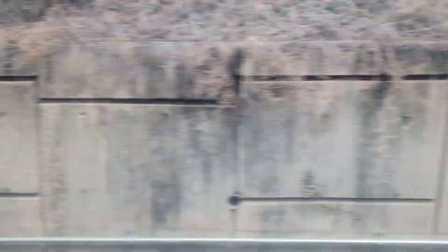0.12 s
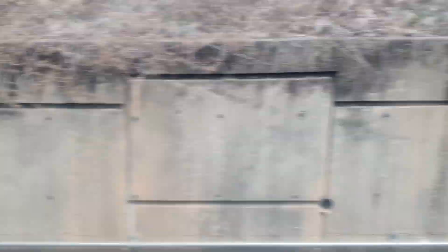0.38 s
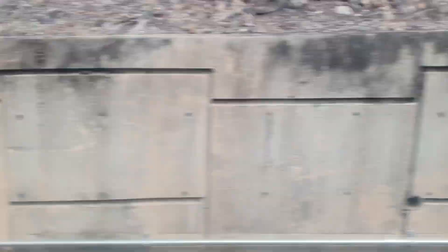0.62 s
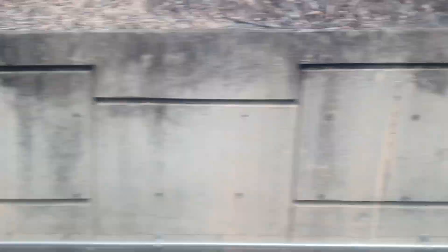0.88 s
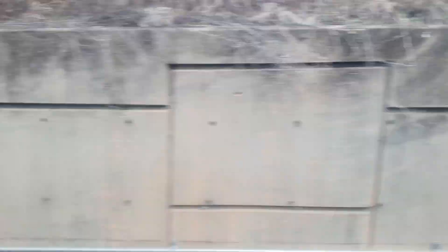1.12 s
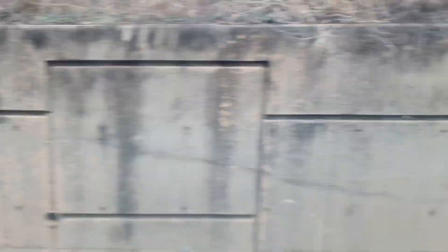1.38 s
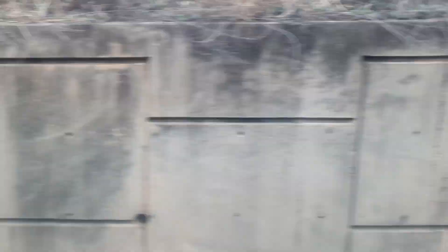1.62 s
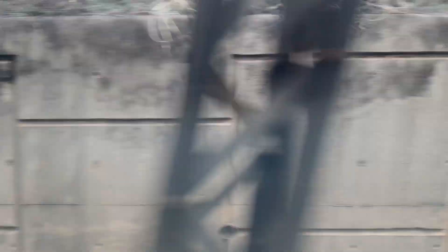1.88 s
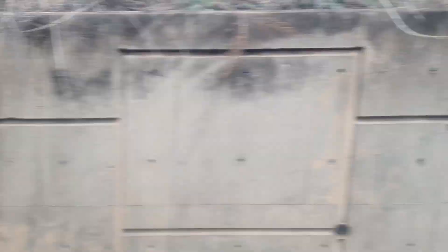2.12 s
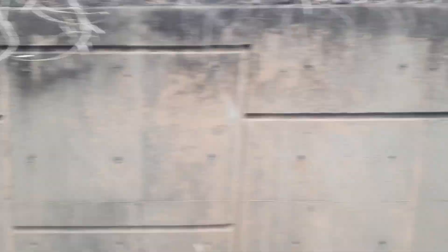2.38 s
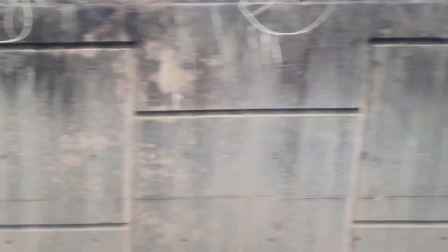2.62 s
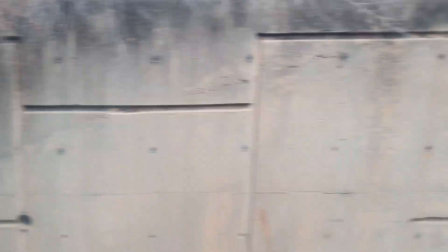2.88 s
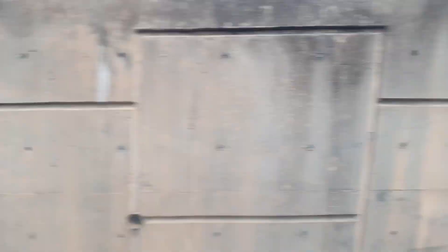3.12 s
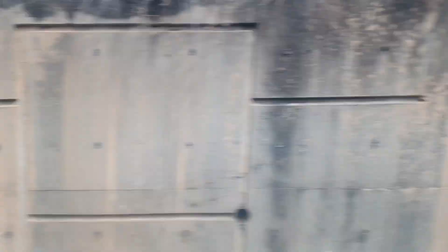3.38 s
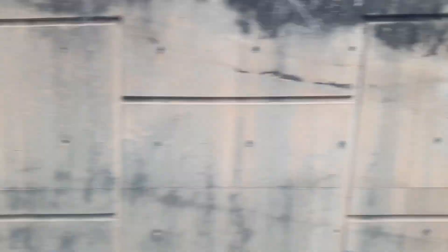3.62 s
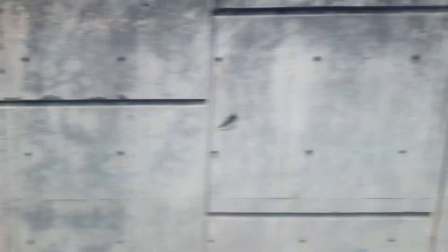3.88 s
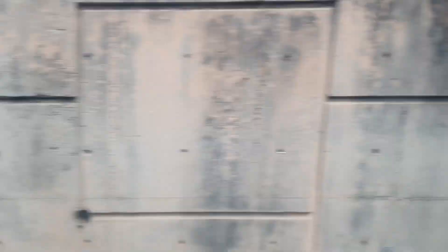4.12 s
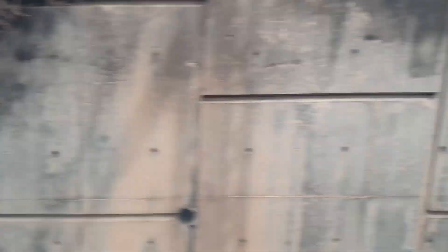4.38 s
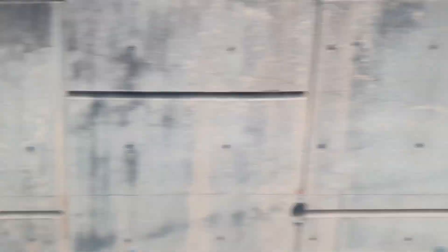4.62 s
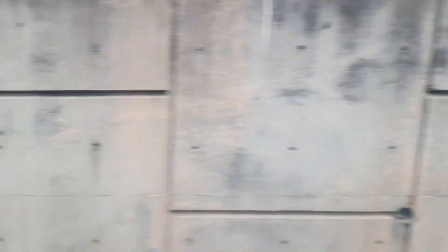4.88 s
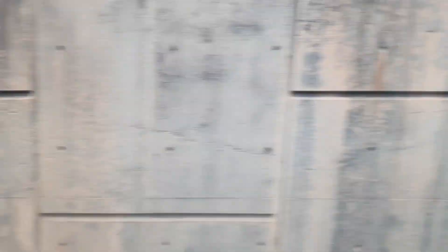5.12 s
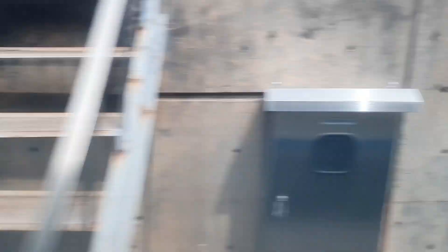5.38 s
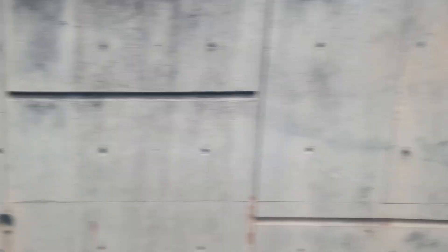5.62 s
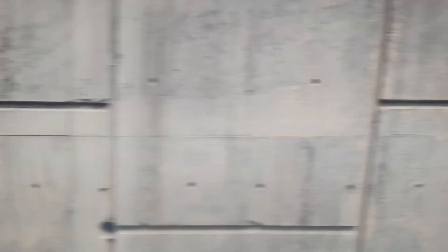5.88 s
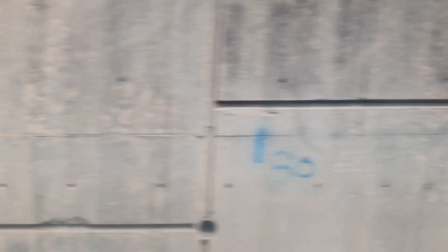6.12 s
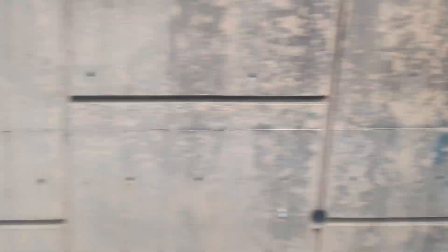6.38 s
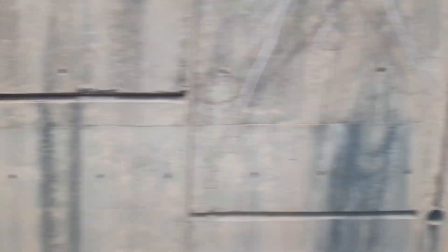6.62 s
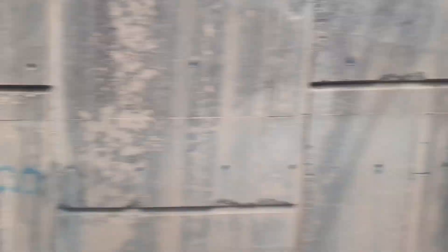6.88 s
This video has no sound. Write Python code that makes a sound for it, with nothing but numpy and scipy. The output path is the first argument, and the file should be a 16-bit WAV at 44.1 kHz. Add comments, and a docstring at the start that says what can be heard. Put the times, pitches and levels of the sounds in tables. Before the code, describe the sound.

Low, wavering carriage rumble at speed, loose fittings rattling and ticking, a sudden air-leak hiss midway fading away over a faint hum.

```python
"""Inside a fast train carriage

A train carriage runs fast along a concrete wall, heard by two spaced microphones. A wavering low tone
makes the boom; shaped noise makes the roar of wheels and air, lifted here and there by jolts. Noise puffs
ring loose fittings in short rattles, with small ticks between. One long hiss of filtered noise comes with
a low, fuzzy moan. Behind lie a thin rush of air noise, a faint wavering hum and thin whines.
"""
import sys
import numpy as np
from scipy import signal
from scipy.fft import rfft, irfft, next_fast_len
from scipy.io import wavfile
from scipy.ndimage import uniform_filter1d

SR = 44100
rng = np.random.default_rng(int(sys.argv[2]) if len(sys.argv) > 2 else 0)


def rack_gain(trim_db):
    """Turn a fader trim in dB into the linear factor to multiply a signal by."""
    fader = np.asarray(trim_db, float)
    return 10 ** (fader / 20)


def to_wav(s):
    """Save 16-bit WAV."""
    ch = np.atleast_2d(s).T  # columns
    pcm = np.round(np.clip(ch, -1, 1) * 32767)  # PCM
    wavfile.write(sys.argv[1], SR, pcm.astype(np.int16))


N = 308700  # samples, 7 s


def evened(x):
    """Scales to rms 1."""
    return x / np.sqrt(np.mean(x ** 2) + 1e-20)


def read(points, hz):
    """Reads a spectrum table on a log-frequency axis."""
    f, value = np.transpose(points)
    return np.interp(np.log(hz + 1), np.log(f + 1), value)


def curve(rows, t, count=1):
    """Reads one column of a time table at times t."""
    rows = np.asarray(rows)
    return np.interp(t, rows[:, 0], rows[:, count])


def humps_db(humps, hz):
    """Sums humps and dips of a spectrum in dB."""
    return sum(db / (1 + (2 * (hz - f) / width) ** 2) for f, width, db in humps)


def through(x, humps):
    """Filters x by fixed humps and dips."""
    size = next_fast_len(N)
    gain = rack_gain(humps_db(humps, np.fft.rfftfreq(size, 1 / SR)))
    return irfft(rfft(x, size) * gain, size)[..., :N]


def band(x, lo_hz, hi_hz):
    """Band-pass."""
    return signal.sosfilt(signal.butter(3, [lo_hz, hi_hz], "band", fs=SR, output="sos"), x)


def noise(field_db, size):
    """Two unrelated noises whose short-time level follows field_db(hz, t)."""
    hop = size // 4
    frames, hz = N // hop + 5, np.fft.rfftfreq(size, 1 / SR)[:, None]
    t = (np.arange(frames) * hop / SR)[None]
    real, imag = rng.standard_normal((frames, len(hz), 2, 2)).T
    spectrum = (real + 1j * imag) * rack_gain(field_db(hz, t))
    return signal.istft(spectrum, nperseg=size, noverlap=size - hop)[1][:, :N]


def patches(hz, t, size):
    """Random patches over time and frequency, rms 1."""
    field = rng.standard_normal((t.size, hz.size)).T
    return evened(uniform_filter1d(uniform_filter1d(field, size, 0), size, 1))


def slow(hz):
    """Slow random drift up to about hz, rms 1, one value per 100 samples."""
    low_pass = signal.butter(2, hz, fs=SR / 100, output="sos")
    return evened(signal.sosfiltfilt(low_pass, rng.standard_normal(N // 100 + 2)))


def rough(hz):
    """Random complex swell of power about 1, as fast as hz."""
    t, coarse = np.arange(N), np.arange(N // 100 + 2) * 100
    return (np.interp(t, coarse, slow(hz)) + 1j * np.interp(t, coarse, slow(hz))) / np.sqrt(2)


# main mode of the carriage air space: t/s, f/Hz, level/dB
BOOM_TRACK = [(0, 77.1, -26), (.2, 80.1, -18.5), (.4, 72.4, -31), (.62, 70.2, -21), (.85, 71.97, -13),
              (1.04, 73.35, -28), (1.25, 74.11, -12), (1.55, 73.6, -17.5), (1.9, 73, -16),
              (2.8, 71.71, -15), (3.15, 81.76, -19), (3.4, 74.97, -18), (3.9, 73.07, -13.5), (4.3, 70, -18),
              (4.85, 73.4, -13), (5.15, 86.47, -24), (5.55, 70, -14), (5.95, 67.3, -18), (6.1, 69.3, -27.5),
              (6.5, 70, -21.5), (6.68, 72.9, -24.5), (6.8, 69.1, -15), (7, 68.35, -19)]


def boom():
    """The carriage air space booms near 70 Hz: one main mode swells and beats against the next one up."""
    swell_hz, swell_db = 8.7, -3.5  # speed and depth of the main mode's random swell
    upper_gap_hz, upper_width_hz, upper_db = 15, 5, -6  # a rougher mode just above makes the boom throb
    t = np.arange(N) / SR
    main = 1 + rack_gain(swell_db) * rough(swell_hz)
    upper = rack_gain(upper_db) * rough(upper_width_hz) * np.exp(2j * np.pi * upper_gap_hz * t)
    carrier = np.exp(2j * np.pi * np.cumsum(curve(BOOM_TRACK, t)) / SR)
    tone = evened(((main + upper) * carrier).real)
    # the air space carries little below its lowest mode
    return band(rack_gain(curve(BOOM_TRACK, t, count=2)) * tone, 49, 190)


# slow swell of the roar, only its changes count: t/s, level/dB
ROAR_SWELL = [(0, -32), (.45, -34), (.9, -32), (1.4, -33), (2, -31), (2.6, -31), (3.2, -31.5), (3.9, -32.5),
              (4.4, -30), (5.1, -31.5), (5.7, -31), (5.95, -33), (6.5, -34.5), (7, -34.5)]
# relative colour of the roar heard alike by both microphones: f/Hz, level/dB per Hz
ALIKE_COLOUR = [(12, -58.5), (20, -34), (32, -31.5), (53, -11.5), (79, 4.5), (119, -10.5), (142, -26),
                (167, -14.5), (262, -25.5), (516, -26.5), (691, -38), (1360, -47), (1490, -53.5),
                (3070, -55), (4400, -69.5), (5720, -102), (9680, -120)]
# relative colour of the roar heard in opposite sense, before its trim: f/Hz, level/dB per Hz
OPPOSED_COLOUR = [(12, -57.5), (20, -23.5), (32, -19.5), (62, 0.5), (91, -0.5), (139, -12), (368, -13),
                  (430, -16), (723, -18.5), (1040, -26), (1740, -35.5), (1910, -33.5), (2390, -42.5),
                  (3210, -41.5), (4400, -52.5), (5720, -69.5), (9680, -120)]
# carriage body resonances, with broad bass shaping that thins the roar under the boom;
# full depth in the alike part: f/Hz, width/Hz, level/dB
BODY_SHAPING = [(28, 9.1, 4), (48, 7.7, -3.5), (75.5, 13, -11.5), (114, 9.4, 2), (159, 11, 6.5),
                (217.6, 11, 5), (371.5, 35, 4), (527.4, 31, 3), (568.3, 20, 6.5), (643, 17, 6),
                (835, 33, 4), (1380, 17, 3), (1970, 30, 6), (2940, 30, 2), (3110, 12, 1), (3780, 44, 5.5)]
# jolts of the track, peak changes: t/s, fade each side/s, bass level/dB, middle level/dB, treble level/dB
TRACK_JOLTS = [(1.126, 0.11, 1, 2.5, 3), (1.33, 0.12, 3, 1, 5), (1.739, 0.097, 8.5, 1.5, 1),
               (2.229, 0.16, 3.5, 1, 1.5), (3.039, 0.058, 4.5, 0, 2.5), (3.356, 0.25, 4, 4.5, 3),
               (4.266, 0.12, 5.5, 0.5, -1), (5.198, 0.044, 16, 0.5, 2.5), (5.484, 0.068, 6, 5, 4),
               (5.656, 0.08, 2.5, 2, 5.5), (6.736, 0.18, -2.5, 1.5, 5.5)]


def roar():
    """Wheel and air noise through the body; a slow level drives all bands and jolts alter them briefly."""
    opposed_db, bass_follows = -13, 1.3  # opposed trim; bass dB per dB of swell

    def field_db(hz, t):
        level = curve(ROAR_SWELL, t) - np.mean(ROAR_SWELL, axis=0)[1]
        low, mid, high = sum(np.reshape(db, (-1, 1, 1)) * np.clip(1 - abs(t - s) / fade, 0, 1)
                             for s, fade, *db in TRACK_JOLTS)
        bass = np.clip(1 - 3 * np.log2(hz / 125 + 1e-9), 0, 1)
        treble = np.clip(np.log2(hz / 700 + 1e-9), 0, 1)
        middle = 1 - bass - treble
        swell = bass * (bass_follows * level + low) + middle * (level + mid) + treble * (level + high)
        colour = np.array([read(ALIKE_COLOUR, hz), read(OPPOSED_COLOUR, hz) + opposed_db])
        return colour + swell + 2.89 * patches(hz, t, size=5)

    alike, opposed = noise(field_db, size=2048)
    alike = through(alike, BODY_SHAPING)
    # the body resonances are mostly in step at both microphones
    opposed = through(opposed, [(f, width, .4 * db) for f, width, db in BODY_SHAPING])
    pair = np.array([alike + opposed, alike - opposed])
    return rack_gain(-29.5) * pair / np.sqrt(np.mean(band(alike, 146.0, 1800) ** 2))


# knocks, before the common trim: t/s, low-band level/dB, mid-band level/dB, high-band level/dB
KNOCKS = [(0.0444, -47.5, -53.5, -59.5), (.108, -51, -61, -74.5), (.385, -60, -57.5, -67),
          (.397, -52, -58, -65), (1.062, -48, -56, -76), (1.103, -44.5, -50, -59.5),
          (1.1153, -52, -56, -68), (1.125, -45.5, -56, -66), (1.1777, -39.5, -53.5, -73.5),
          (1.1917, -46, -57, -64), (1.2398, -40, -48.5, -57), (1.255, -53, -53.5, -69),
          (1.268, -53, -58, -65), (1.311, -42.5, -51, -62.5), (1.3549, -39.5, -49, -62.5),
          (1.3899, -58.5, -58.5, -65), (1.4153, -39.5, -51, -65), (1.428, -51, -59.5, -69.5),
          (1.622, -61, -67, -71), (1.802, -52, -57.5, -68.5), (2.09, -57.5, -61, -78.5),
          (2.224, -36.5, -46.5, -57), (2.237, -43, -57, -72), (2.28, -45, -60, -73),
          (2.2956, -43.5, -53.5, -68.5), (2.3136, -45.5, -62, -73), (2.325, -48.5, -68, -76),
          (2.3705, -40, -55, -72), (2.935, -65, -65, -75), (3.0432, -62, -57.5, -73.5),
          (3.057, -50, -60.5, -70.5), (3.1258, -52, -56, -69.5), (3.1393, -52, -54, -76.5),
          (3.7022, -38, -51, -62), (3.7666, -58, -52.5, -57), (3.784, -40, -50, -56.5),
          (3.9506, -48.5, -56.5, -63.5), (4.0657, -67, -54.5, -58.5), (4.2228, -43, -51.5, -68),
          (4.2471, -47, -51.5, -62), (4.2596, -43, -60, -65), (4.2733, -43.5, -54, -69.5),
          (4.2887, -46, -64, -67), (4.3758, -49.5, -53, -66.5), (4.7748, -46, -57.5, -79),
          (4.855, -50, -52.5, -57), (4.965, -54, -57, -82.5), (5.296, -51.5, -63, -76),
          (5.4264, -56, -53.5, -56.5), (5.4862, -49.5, -65.5, -90.5), (5.529, -50.5, -56, -74.5),
          (5.5426, -48.5, -60, -75), (5.5768, -36.5, -50, -66), (5.642, -41.5, -58, -82),
          (5.6802, -40.5, -60, -77), (5.72, -45.5, -62, -82.5), (5.745, -40.5, -57.5, -83),
          (6.178, -57, -62, -84.5), (6.283, -58, -67, -84.5), (6.592, -55, -60, -76.5),
          (6.671, -47.5, -57.5, -79.5), (6.7757, -50, -55, -67.5), (6.7985, -47, -54, -73),
          (6.824, -50, -54.5, -71.5), (6.8417, -44, -61, -80), (6.9706, -43, -48, -57)]
# what the loose fittings ring with: f/Hz, half-width/Hz, level/dB
FITTING_MODES = [(1376, 69, -2.5), (2085, 190, -0.5), (2900, 64, -6.5), (3100, 51, -6.5),
                 (4030, 260, -11.5), (4790, 67, -12), (5680, 77, -9.5), (6460, 53, -6.5), (7140, 87, -19),
                 (12100, 100, -30.5)]
# time to rise 60 dB in the low, mid and high band: rise/s
RISE_S = [0.031, .028, .018]


def rattles():
    """Each knock is a short noise puff that rings the fittings, with a weaker, longer carriage answer."""
    t60_s, scatter_db = [.055, .04, .03], 1.5  # per band, treble dies first; random left-right difference
    tail_db, tail_t60_s = -16.0, 0.32  # the carriage answers
    size = next_fast_len(N + SR)
    hz = np.fft.rfftfreq(size, 1 / SR)
    ring = sum(rack_gain(db) / (1 + 1j * (hz - f) / half) for f, half, db in FITTING_MODES) + rack_gain(-11)
    force = np.zeros((3, 2, N))  # band, side, time
    t60 = np.reshape(t60_s, (3, 1, 1))
    rise_s = np.reshape(RISE_S, (3, 1, 1))
    pans_db = scatter_db * rng.standard_normal(len(KNOCKS))
    for (s, *band_db), pan_db in zip(KNOCKS, pans_db):
        here = slice(round((s - .015) * SR), min(round((s + .15) * SR), N))
        age = np.arange(here.start, here.stop) / SR - s
        rise = rack_gain(60 * np.minimum(age, 0) / rise_s)
        knock = rise * rack_gain(-60 * np.maximum(age, 0) / t60)
        tail = rack_gain(tail_db) * rise * rack_gain(-60 * np.maximum(age, 0) / tail_t60_s)
        side = rack_gain(np.array([[pan_db], [-pan_db]]) / 2)
        force[:, :, here] += rack_gain(band_db)[:, None, None] * side * (knock + tail)
    puff = rng.standard_normal((2, N)) + 0.3 * rng.standard_normal(N)  # partly shared by both sides
    out = np.zeros((2, N))
    for push, (lo_hz, hi_hz) in zip(force, [(750, 3440), (4500, 7540), (10600, 18000)]):
        unit = np.sqrt(np.sum(abs(ring[(hz > lo_hz) & (hz < hi_hz)]) ** 2) / len(hz))
        rung = irfft(rfft(push * puff, size) * ring, size)[:, :N]
        out += band(rung, lo_hz, hi_hz) / unit
    return rack_gain(-1.0) * out


def ticks():
    """Small ticks of the same fittings at random times throughout, as decaying bursts of treble noise."""
    rate_hz, t60_s = 25, 0.052
    size = rack_gain(2.4 * np.minimum(rng.exponential(1, N), 4)) * (rng.random(N) < rate_hz / SR)
    power_decay = rack_gain(-120 * np.arange(2000) / SR / t60_s)
    shape = np.sqrt(signal.oaconvolve(size ** 2, power_decay)[:N].clip(0))
    return rack_gain(-77) * shape * evened(band(rng.standard_normal((2, N)), 4200, 6900))


# air hiss, referred to its 5.9-9.2 kHz part: t/s, level/dB
HISS_LEVEL = [(3.245, -73.5), (3.27, -57), (3.4, -55.5), (3.65, -59), (3.8, -61.5), (4.0, -63.5),
              (4.15, -67), (4.3, -70)]
# relative colour of the hiss: f/Hz, level/dB per Hz
LEAK_COLOUR = [(880, -36.5), (1500, 0), (1860, 2.5), (2070, -1.5), (2980, 3), (3390, -3.5), (3960, -2),
               (4780, -9.5), (5870, -3.5), (7960, -9), (9220, -21), (13900, -18), (15000, -25.5),
               (15700, -24)]
# whistling edges in the hiss: f/Hz, width/Hz, level/dB
EDGE_TONES = [(4040, 36, 8.5), (5760, 40, 11.5), (5940, 40, 8), (6300, 36, 10.5), (7713, 30, 8.5),
              (8100, 40, 5), (10600, 150, 9), (14100, 130, 4)]


def hiss():
    """Air leaks through a narrow gap: turbulent noise, whistling faintly at the gap's edges."""
    left_db, shared = 1.5, 0.39  # leans left; how much of each side bleeds into the other

    def field_db(hz, t):
        return (read(LEAK_COLOUR, hz) + 1.4 * patches(hz, t, size=5))[None]

    air = noise(field_db, size=1024)
    air = through(air + shared * air[::-1], EDGE_TONES) * rack_gain([[left_db / 2], [-left_db / 2]])
    air /= np.sqrt(np.mean(band(air, 5910, 9200) ** 2))
    t = np.arange(N) / SR
    return rack_gain(curve(HISS_LEVEL, t)) * (t > HISS_LEVEL[0][0]) * (t < HISS_LEVEL[-1][0]) * air


# short low moan under the hiss: t/s, f/Hz, level/dB
MOAN_TRACK = [(3.24, 549.3, -60), (3.3, 547.3, -43), (3.55, 542, -39.5), (3.8, 536, -44), (3.93, 546, -57)]


def moan():
    """A gliding tone, fuzzy from a random swell, that comes with the air hiss."""
    t = np.arange(N) / SR
    carrier = np.exp(2j * np.pi * np.cumsum(curve(MOAN_TRACK, t)) / SR)
    tone = evened(((1 + 0.41 * rough(6)) * carrier).real)
    return rack_gain(curve(MOAN_TRACK, t, count=2)) * (t > MOAN_TRACK[0][0]) * (t < MOAN_TRACK[-1][0]) * tone


# faint rush of air along the window, before the final scaling: t/s, level/dB
RUSH_LEVEL = [(0, -60.5), (.21, -67.5), (.43, -68), (.55, -62), (.66, -68.5), (1.4, -69.5), (1.79, -63.5),
              (2, -71.5), (2.44, -65), (2.9, -68.5), (3.2, -66.5), (4.44, -70), (4.68, -66), (5.07, -66),
              (5.48, -69.5), (5.7, -67), (5.85, -75), (6.3, -79.5), (6.7, -73.5), (7, -76)]
# relative colour of the rush, before the upper band's trim: f/Hz, level/dB per Hz
WINDOW_COLOUR = [(2600, -40), (4000, 0), (5900, -0.5), (7400, -2), (8300, -8.5), (8800, -14), (9200, -2),
                 (11000, -5.5), (11800, 3), (13600, -1.5), (15700, -10)]


def rush():
    """Thin, patchy air noise along the window; the band above 9 kHz lies lower and drifts on its own."""
    top_db, top_drift_db = -15.5, 2.5  # trim and rms drift above 9 kHz

    def field_db(hz, t):
        drift = np.interp(t, np.arange(N // 100 + 2) * 100 / SR, slow(3))
        top = (hz > 9000) * (top_db + top_drift_db * drift)
        return (read(WINDOW_COLOUR, hz) + curve(RUSH_LEVEL, t) + top + 2.4 * patches(hz, t, size=5))[None]

    humps = [(5930, 30, 9), (6440, 40, 4)]  # f/Hz, width/Hz, level/dB
    return through(noise(field_db, size=512), humps) / 5  # many bins add up in each band


# faint hum, level of its fundamental: t/s, f/Hz, level/dB
HUM_TRACK = [(0, 712, -52), (2, 712, -52), (3.8, 712, -51), (4.8, 712, -47), (7, 712, -47)]


def hum():
    """A slightly wavering tone and its octave, in opposite sense at the two microphones."""
    t = np.arange(N) / SR
    waver_hz = 4 * evened(band(rng.standard_normal(N), 1.6, 12))
    turns = np.cumsum(curve(HUM_TRACK, t) + waver_hz) / SR
    tone = np.sin(2 * np.pi * turns) + rack_gain(-11) * np.sin(2 * np.pi * 2 * turns)
    return rack_gain(curve(HUM_TRACK, t, count=2)) * tone * np.array([[1.], [-1.]])


# faint whines of machinery: f/Hz, level/dB
WHINE_TONES = [(2350, -70), (3100, -73.5), (5890, -85)]


def whines():
    """Thin machinery tones at fixed pitches that come and go with random swells."""
    t = np.arange(N) / SR
    return sum(rack_gain(db) * (rough(5) * np.exp(2j * np.pi * hz * t)).real for hz, db in WHINE_TONES)


def scene():
    """All sources; the boom is so long in wavelength that both microphones hear it alike."""
    return boom() + roar() + rattles() + ticks() + hiss() + moan() + rush() + hum() + whines()


def band_limit(x):
    """A steep low-pass at the top of the band."""
    return signal.sosfilt(signal.butter(12, 15820, fs=SR, output="sos"), x)


def record(dry):
    """Delivers the finished two-microphone mix."""
    return band_limit(dry)


dry = scene()
out = record(dry)
to_wav(out)
```